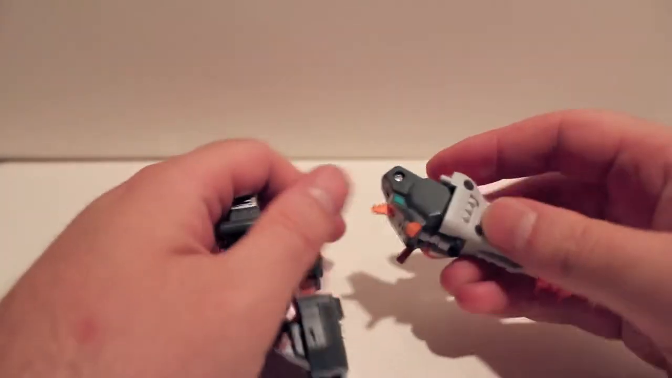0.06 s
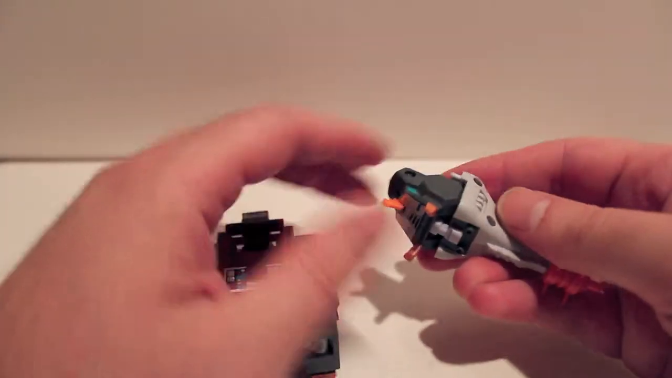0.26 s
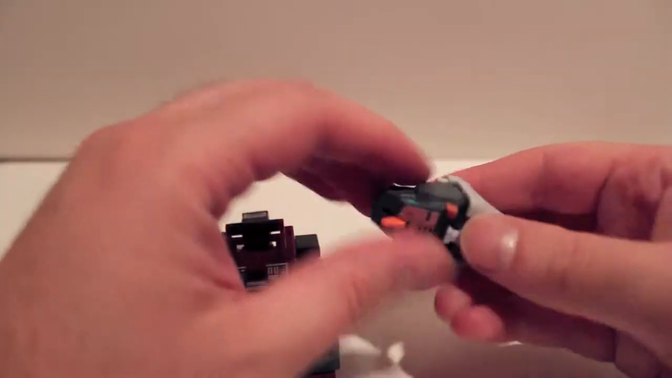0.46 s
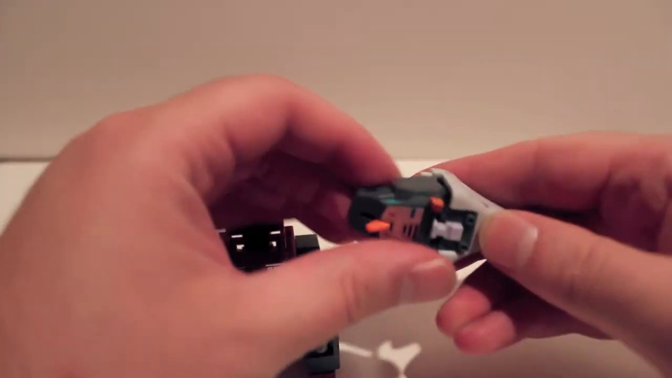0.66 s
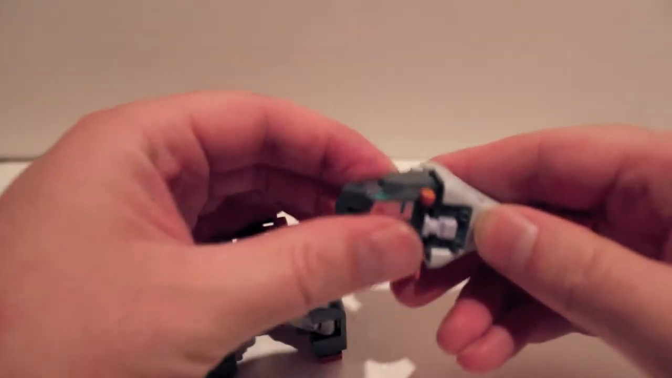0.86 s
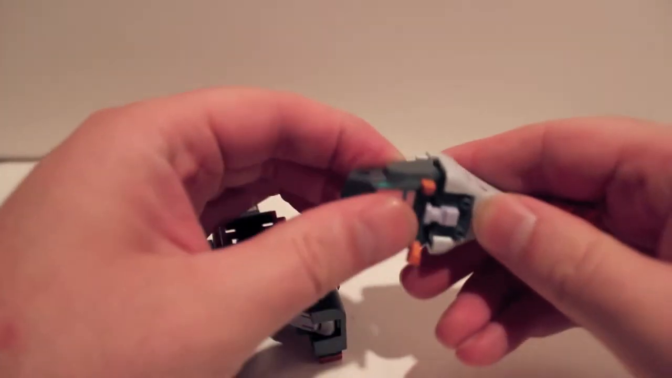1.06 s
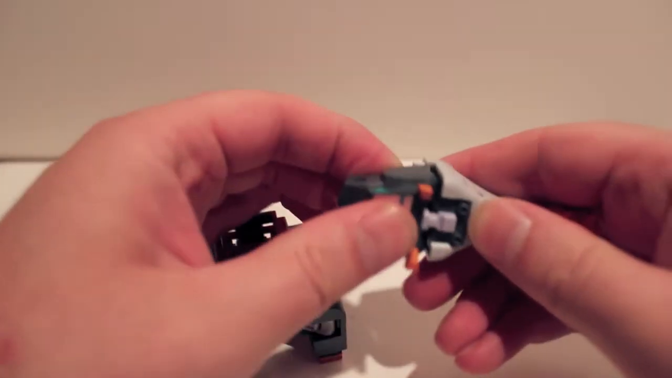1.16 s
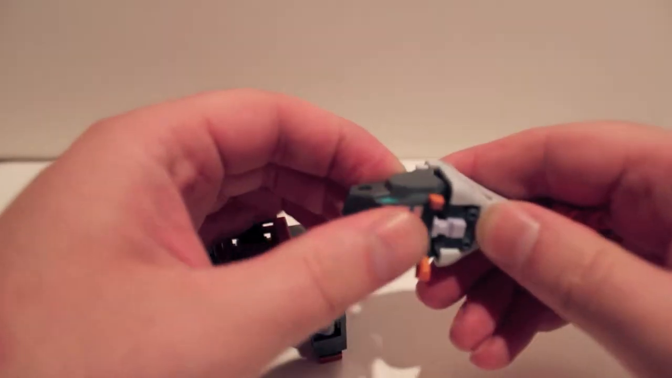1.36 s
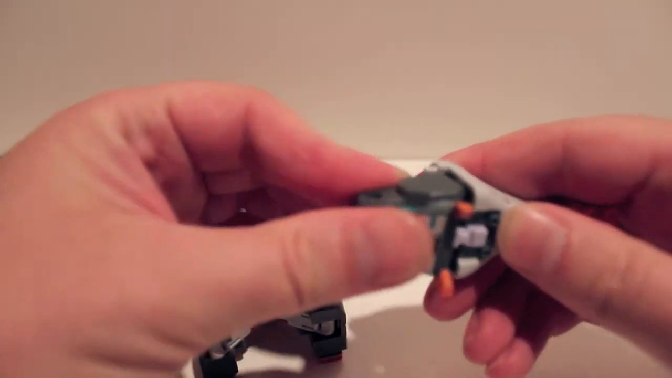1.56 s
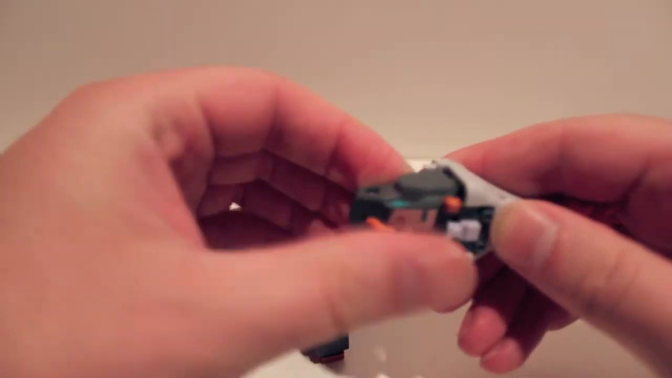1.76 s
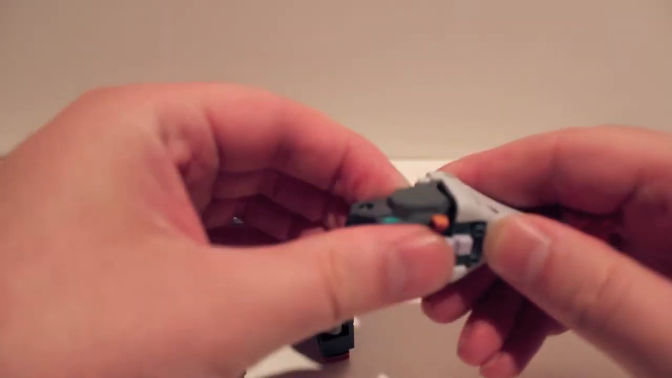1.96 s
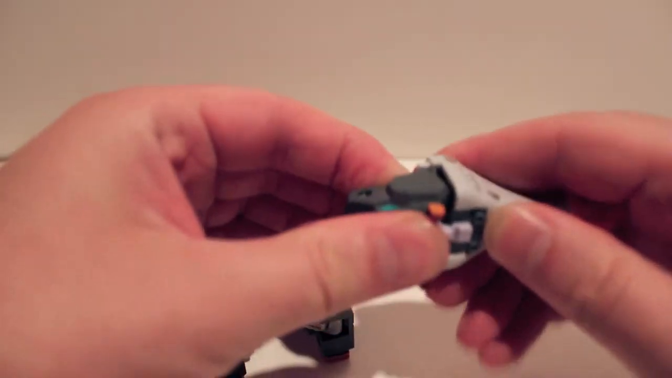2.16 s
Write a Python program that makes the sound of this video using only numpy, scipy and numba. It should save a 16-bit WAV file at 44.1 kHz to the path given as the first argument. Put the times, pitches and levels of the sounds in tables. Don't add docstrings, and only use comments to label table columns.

```python
import sys
import numpy as np
from scipy import signal
from scipy.fft import rfft, irfft
from scipy.io import wavfile
from scipy.ndimage import uniform_filter1d
from numba import njit

SR = 44100
rng = np.random.default_rng(int(sys.argv[2]) if len(sys.argv) > 2 else 0)


def materialize(psi):
    bounded = np.clip(np.atleast_2d(psi).T, -1, 1)
    quanta = np.round(bounded * 32767).astype(np.int16)
    wavfile.write(sys.argv[1], SR, quanta)


def to_linear_factor(level_db):
    exponent = np.asarray(level_db, float) / 20
    return 10 ** exponent


N = 97020
PAD = 4410


@njit
def svf(x, hz, width):
    y, b, l = np.empty(len(x)), 0., 0.
    g, k = np.tan(np.pi * hz / SR), width / hz
    for i in range(len(x)):
        v = (b + g * (x[i] - l)) / (1 + g * (g + k))
        b, l, y[i] = 2 * v - b, l + 2 * g * v, k * v
    return y


def band(x, hz, width_hz):
    return svf(x + 1e-18, float(hz), float(width_hz))


def band_twice(x, hz, first_width_hz, second_width_hz):
    return band(band(x, hz, first_width_hz), hz, second_width_hz)


def highpass(x, order, hz):
    return signal.sosfilt(signal.butter(order, hz, "high", fs=SR, output="sos"), x)


def unit(x):
    return x / np.sqrt(np.mean(x ** 2))


def add(out, start_s, x):
    i = int(start_s * SR) + PAD
    out[i:i + len(x)] += x[:len(out) - i]


def fade(t, t60_s):
    return to_linear_factor(-60 * t / t60_s)


def soft_edges(t, length_s):
    edge_s = 0.045
    return np.clip(np.minimum(t, length_s - t) / edge_s, 0, 1)


def walk(rate, size):
    hold = int(SR / rate)
    levels = np.repeat(rng.standard_normal(size // hold + 1), hold)
    return uniform_filter1d(levels, hold)[:size]


def curve(table, column):
    points = np.array(table)
    return np.interp(np.arange(N) / SR, points[:, 0], points[:, column])


def steady(x):
    evenness = 0.6
    return unit(x / np.abs(signal.hilbert(x)) ** evenness)


# [start_s, level_db, pitch_hz]
HUM = [(0.0, -57, 58), (0.04, -46, 58.85), (0.54, -61.5, 59), (0.65, -54, 59.35), (0.92, -50, 58),
       (1.35, -47.5, 58.24), (1.59, -54.5, 57.9), (1.76, -58, 60.1), (1.81, -74, 60.6), (1.84, -59, 60.6),
       (2.11, -50, 60.1), (2.2, -46.5, 59.2)]
# [start_s, level_db]
BOOM = [(0.4, -58), (0.534, -58.5), (0.554, -56.5), (1.026, -52), (1.216, -42), (1.432, -48.5),
        (1.456, -40.5), (1.582, -55), (1.618, -47.5), (1.738, -42.5), (1.768, -52), (1.808, -41.5),
        (1.848, -55), (1.868, -44), (1.974, -50), (2.008, -41.5), (2.048, -50), (2.2, -53)]
# [pitch_hz, width_hz, level_db]
BOOM_MODES = [(131.2, 19.7, -3), (107.2, 23, -8.5), (218, 16, -18.5)]
# [pitch_hz, level_db per Hz]
HISS_COLOUR = [(120, -4.5), (200, -6.5), (311, -5), (340, -6), (373, -9.5), (777, -14), (1350, -16.5),
               (11100, -31), (16000, -32.5)]


def room():
    t = np.arange(N) / SR
    hum_phase = 2 * np.pi * np.cumsum(curve(HUM, 2)) / SR
    hum = np.sqrt(2) * to_linear_factor(curve(HUM, 1)) * np.sin(hum_phase)
    boom = sum(to_linear_factor(db) * steady(band_twice(rng.standard_normal(N), hz, width, 2 * width))
               for hz, width, db in BOOM_MODES)
    boom = to_linear_factor(curve(BOOM, 1)) * boom
    rumble = to_linear_factor(-65.5) * unit(band_twice(rng.standard_normal(N), 65.6, 40, 40))
    whine_on = (t > 0.98) * (t < 1.42)
    whine = to_linear_factor(-79) * np.sin(2 * np.pi * 11100 * t) * whine_on
    f = np.maximum(np.arange(N // 2 + 1) * SR / N, 1)
    colour_hz, colour_db = np.transpose(HISS_COLOUR)
    colour = to_linear_factor(np.interp(np.log(f), np.log(colour_hz), colour_db))
    low_cut = np.minimum(f / 180, 1) ** 2
    hiss = to_linear_factor(-57) * unit(irfft(rfft(rng.standard_normal(N)) * colour * low_cut, N))
    return hum + boom + rumble + whine + hiss


# [start_s, length_s, level_db, lowest_hz]
RUBS = [(-.05, 0.26, -54.5, 8000), (0.376, 0.08, -57.5, 6030), (0.497, 0.071, -50, 8050),
        (0.62, 0.042, -46, 7000), (0.796, 0.14, -59.5, 7040), (1.413, 0.23, -60, 5470),
        (1.495, 0.2, -59, 4455), (1.717, 0.17, -54.5, 5000), (1.779, 0.26, -57.5, 2900),
        (2.09, 0.11, -69, 2990), (0.099, 0.625, -64.5, 4000), (0.709, 0.29, -68.5, 3500)]
# [pitch_hz, width_hz, level_db]
SHELL = [(3050, 510, 25.5), (4000, 640, 18), (5000, 320, 16.5), (5860, 1070, 10), (7100, 1600, -25),
         (8800, 1800, 3), (10500, 1700, 11), (12500, 3500, 5), (14500, 3100, 11)]


def rubs():
    grains_per_s, flicker_db = 660, 1.5
    flecks_per_s, fleck_db, shell_db = 200, 2.5, -5
    out, t = np.zeros(N + PAD), np.arange(SR * 2 // 3) / SR
    size = len(t)
    for start_s, length_s, level_db, lowest_hz in RUBS:
        slips = rng.random(size) < grains_per_s / SR
        skin = rng.standard_normal(size) * (1 + 2.2 * slips)
        shell = sum(to_linear_factor(db + fleck_db * walk(flecks_per_s, size)) * band(skin, hz, width)
                    for hz, width, db in SHELL)
        rub = highpass(unit(skin) + to_linear_factor(shell_db) * unit(shell), 2, lowest_hz)
        envelope = soft_edges(t, length_s) * to_linear_factor(flicker_db * walk(67.2, size))
        add(out, start_s, to_linear_factor(level_db) * envelope * unit(rub))
    return out[PAD:]


# [start_s, length_s, level_db, ribs_per_s]
SCRAPES = [
    (1.785, 0.22, -61, 69.7),
    (1.49, 0.18, -60, 67),
    (1.74, 0.23, -63.5, 69.7),
]
# [pitch_hz, width_hz, level_db]
SCRAPE_MODES = [
    [(3120, 170, -2), (3960, 170, -1), (5000, 250, -1.5), (5750, 200, 1)],
    [(5000, 400, -4), (8600, 500, -1), (10400, 600, 0), (12300, 700, 1), (14300, 900, 0)],
    [(9200, 600, 1), (11250, 700, 0), (13200, 700, -2), (14500, 800, -1)],
]


def scrape():
    rib_jitter, rib_duty = 0.12, 0.4
    out, t = np.zeros(N + PAD), np.arange(SR // 3) / SR
    size = len(t)
    for (start_s, length_s, level_db, ribs_per_s), modes in zip(SCRAPES, SCRAPE_MODES):
        rate = ribs_per_s * (1 + rib_jitter * walk(40, size))
        rib_phase = np.cumsum(rate) / SR % 1
        puffs = rng.standard_normal(size) * np.exp(-rib_phase / rib_duty)
        drag = sum(to_linear_factor(db + 2 * walk(29, size)) * unit(band_twice(puffs, hz, width, 2 * width))
                   for hz, width, db in modes)
        add(out, start_s, to_linear_factor(level_db) * soft_edges(t, length_s) * unit(drag))
    return out[PAD:]


# [start_s, length_s, pitch_hz, width_hz, peak as share of length]
SQUEAKS = [(.365, .075, 4480, 200, .7), (.485, .085, 4480, 120, .72), (.525, .035, 4700, 220, .6),
           (.565, .03, 4550, 200, .6), (.595, .055, 8460, 300, .8), (.64, .075, 4460, 120, .3),
           (.632, .02, 3950, 300, .5), (.503, .025, 4050, 250, .4), (.845, .038, 4250, 400, .6),
           (.888, .024, 4400, 450, .7), (.91, .022, 4400, 200, .4), (.944, .012, 2400, 190, .6),
           (1.725, .036, 6300, 800, .6), (1.73, .03, 3700, 500, .5), (.375, .07, 10700, 250, .5),
           (.515, .047, 10700, 450, .7), (.515, .045, 13800, 400, .6), (.857, .013, 11700, 250, .7),
           (2.13, .065, 4200, 900, .4), (.58, .09, 10450, 350, .7), (1.535, .045, 3750, 500, .4),
           (.944, .012, 7700, 300, .6)]
SQUEAK_DB = [-61, -47, -55, -63, -55, -64, -64, -65, -58, -52, -64, -56, -60, -65, -68, -56, -57, -54.5,
             -67, -67, -62, -65]


def squeaks():
    out, size = np.zeros(N + PAD), SR // 4
    for (start_s, length_s, hz, width, peak), level_db in zip(SQUEAKS, SQUEAK_DB):
        progress = np.arange(size) / SR / length_s
        swell = np.interp(progress, [0, peak, 1], [.4, 1, 0]) ** 1.5
        flutter = to_linear_factor(1.5 * walk(150, size))
        ring = unit(band_twice(rng.standard_normal(size), hz, width, 2 * width))
        add(out, start_s, to_linear_factor(level_db) * swell * flutter * ring)
    return out[PAD:]


# [start_s, peak
# level_db, main ring pitch_hz]
TICKS = [(0.0474, -32, 11000), (0.1973, -24, 7400), (0.237, -33, 6950), (0.256, -33, 13600),
         (0.4166, -45, 8800), (0.5091, -32.5, 12600), (.638, -50, 5500), (0.7523, -50.5, 7200),
         (0.904, -50, 7800), (0.9306, -39, 12500), (.975, -43.5, 4600), (0.979, -47, 14500),
         (1.0143, -52, 15000), (1.073, -49.5, 4000), (1.427, -48, 13200), (1.481, -54, 10270),
         (1.534, -49, 14000), (1.547, -42, 13500), (1.577, -48, 12500), (1.608, -46, 14400),
         (1.615, -42, 14300), (1.638, -43, 10500), (1.6476, -48, 10200), (1.774, -43, 9300),
         (1.789, -44, 9500), (1.796, -47, 11000), (1.802, -46, 5920), (1.822, -47, 4100),
         (1.852, -53, 3100), (1.86, -50, 4000), (1.881, -38.5, 10500), (1.8895, -40, 6450),
         (1.903, -49, 4100), (1.9432, -47, 5500), (1.9785, -43, 4040), (1.993, -55, 3500),
         (2.127, -46, 3865), (2.15, -57, 3900)]


def ticks():
    t60_s, rise_s, ring_q = 0.0078, 0.00058, 5.2
    wide_db = -6
    out, t = np.zeros(N + PAD), np.arange(1024) / SR
    for start_s, level_db, hz in TICKS:
        burst = rng.standard_normal(len(t)) * fade(t, t60_s) * np.minimum(t / rise_s, 1)
        ring = 2 * band(burst, hz, hz / ring_q)
        wide_hz = (hz + 11000) / 2
        tick = ring + to_linear_factor(wide_db) * band_twice(burst, wide_hz, 12000, 12000)
        add(out, start_s, to_linear_factor(level_db) * tick / np.abs(tick).max())
    return out[PAD:]


# [start_s, level_db, pitch_hz, t60_s]
PART = [(.001, -21, 253, 0.041), (.0335, -30, 290, 0.048), (.054, -39.5, 299, 0.17),
        (.126, -52.5, 850, 0.063), (.2362, -20, 1397, 0.022), (.2365, -30.5, 2450, 0.021),
        (.238, -44, 3500, 0.021), (.2395, -27.5, 730, 0.046), (0.257, -34, 1550, 0.032),
        (.265, -26.5, 334, 0.055), (.2045, -17, 697, 0.046), (.262, -41, 856, 0.11), (.03, -46, 500, .25),
        (.198, -22, 7200, .012), (.2358, -34, 14300, .008), (.211, -40, 12000, .01), (.2065, -18, 480, .03),
        (.245, -42, 1890, .15), (.207, -34, 1950, .04), (.25, -42, 1250, .15)]


def part():
    out, t = np.zeros(N + PAD), np.arange(SR // 4) / SR
    for start_s, level_db, hz, t60_s in PART:
        ring = np.sin(2 * np.pi * hz * t) * np.minimum(t * hz, 1)
        add(out, start_s, to_linear_factor(level_db) * fade(t, t60_s) * ring)
    return out[PAD:]


# [pitch_hz,
# level_db, t60_s]
TABLE = [(139.1, -9.5, 0.19), (256.4, -10.5, 0.3), (333, -19.5, 0.33), (383, -20, 0.2), (460.8, -5.5, 0.15),
         (539, -2, 0.062), (685, -0.5, 0.066), (680, -5.5, 0.017), (846, -16.5, 0.2), (1244, -13.5, 0.1),
         (1369, -18, 0.096), (1466, -6, 0.054), (1595, -23, 0.13), (2002, -17, 0.12)]
# [pitch_hz, level_db, t60_s]
DIFFUSE = [(151, -16.5, 0.26), (275, -13.5, 0.4), (498, -23, 0.29), (730, -21.5, 0.14), (1590, -24.5, 0.36),
           (2670, -26.5, 0.12), (5440, -55, 0.033), (11000, -27, 0.11)]
# [pitch_hz, width_hz, level_db]
CRACK = [(1430, 397, 9), (3500, 9900, -9.5), (7130, 460, -4.5), (11000, 13000, -29), (14500, 7600, -8.5)]
# [start_s, blow level_db, crack level_db, contact_ms]
KNOCKS = [
    (-.014, -23.5, -54, 2.2),
    (.1974, -9.5, -10.5, 0.48),
    (.2055, -24.5, -23, 1.25),
    (.2358, -25.5, -24, 0.11),
    (.2558, -31, -34, 0.2),
    (.272, -30, -36.5, 2.34),
    (.9305, -50, -45, 0.64),
]


def table_ring(t, contact_ms, spot):
    spread_db, longest_t60_s = 2, 0.45
    swell_cycles, swell_below_hz = 0.95, 420
    ring = np.zeros(len(t))
    for offset, (hz, db, t60_s) in zip(spot, TABLE):
        mode = fade(t, min(t60_s, longest_t60_s)) * np.sin(2 * np.pi * hz * t)
        if hz < swell_below_hz:
            mode *= 1 - np.exp(-t * hz / swell_cycles)
        ring += to_linear_factor(db + spread_db * offset) * mode
    push = np.sin(np.pi * np.clip(t[:200] * 1000 / contact_ms, 0, 1))
    return np.convolve(ring, push / push.sum())[:len(t)]


def crack(t):
    noise = rng.standard_normal(len(t)) * fade(t, 0.02)
    return sum(to_linear_factor(db) * band(noise, hz, width) for hz, width, db in CRACK)


def diffuse_tail(t):
    longest_t60_s, rise_s = 0.33, 0.008
    noise = rng.standard_normal(len(t))
    tail = sum(to_linear_factor(db) * unit(band_twice(noise, hz, 0.67 * hz, 0.67 * hz))
               * fade(t, min(t60_s, longest_t60_s)) for hz, db, t60_s in DIFFUSE)
    return tail * np.minimum(t / rise_s, 1)


def knocks():
    out, t = np.zeros(N + PAD), np.arange(SR // 2) / SR
    for k, (start_s, blow_db, crack_db, contact_ms) in enumerate(KNOCKS):
        spot = rng.standard_normal(len(TABLE)) * (k != 1)
        blow = table_ring(t, contact_ms, spot) + diffuse_tail(t)
        add(out, start_s, to_linear_factor(blow_db) * blow + to_linear_factor(crack_db) * crack(t))
    return highpass(out, 4, 115)[PAD:]


def scene():
    handling = rubs() + scrape() + squeaks() + ticks()
    return (room() + handling + part() + knocks())[None]


def top_cut(x):
    return signal.sosfilt(signal.butter(12, 16620, fs=SR, output="sos"), x)


def record(dry):
    soft = signal.sosfilt(signal.ellip(6, .5, 30, 15650, fs=SR, output="sos"), dry)
    mix = np.clip(1.588 * soft, -1, 1)
    return top_cut(mix)


dry = scene()
out = record(dry)
materialize(out)
```